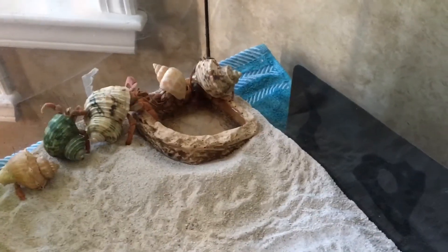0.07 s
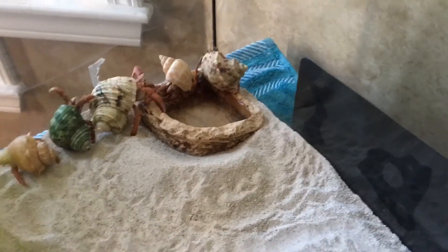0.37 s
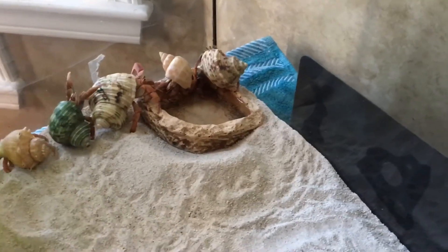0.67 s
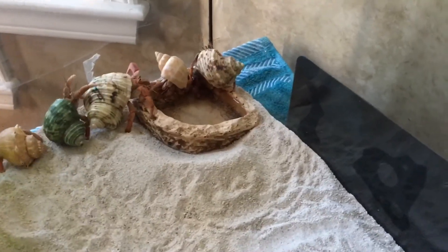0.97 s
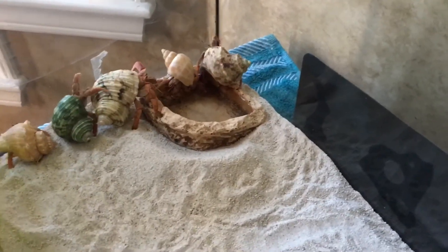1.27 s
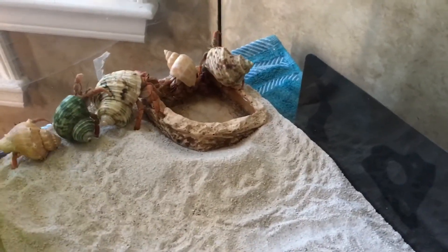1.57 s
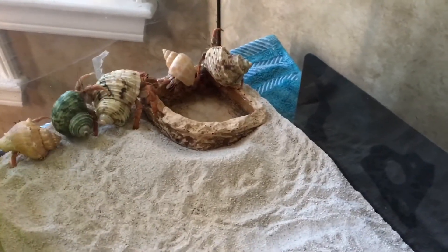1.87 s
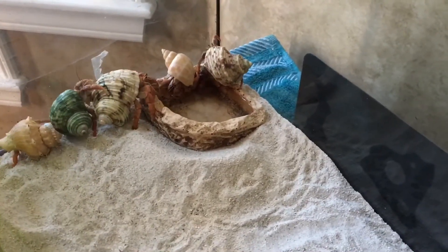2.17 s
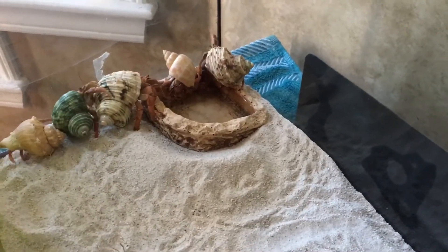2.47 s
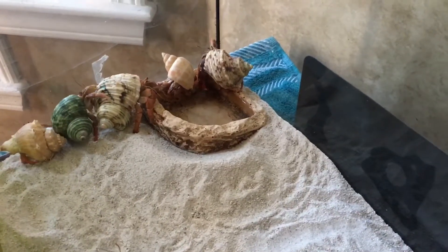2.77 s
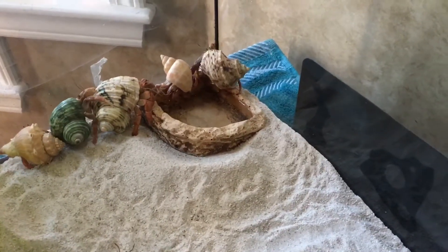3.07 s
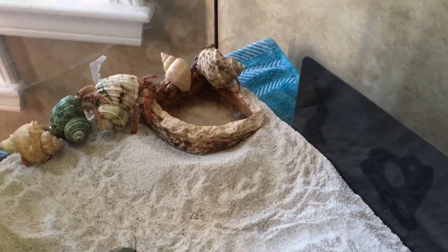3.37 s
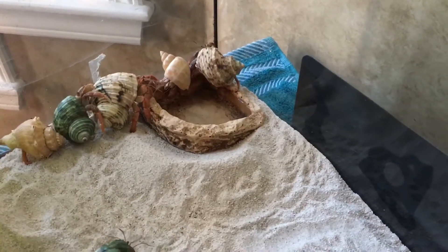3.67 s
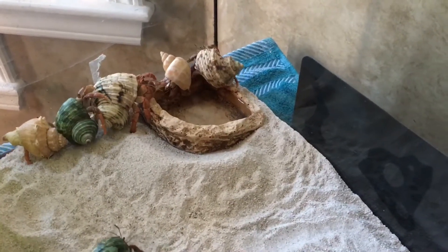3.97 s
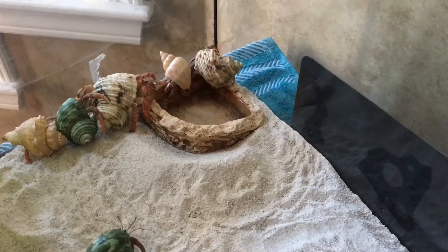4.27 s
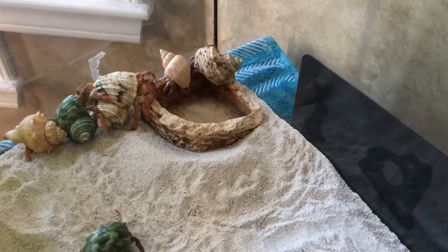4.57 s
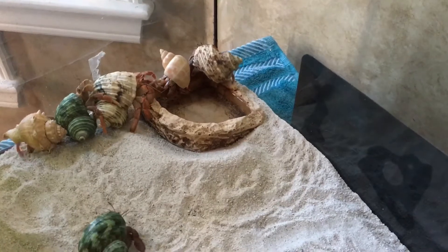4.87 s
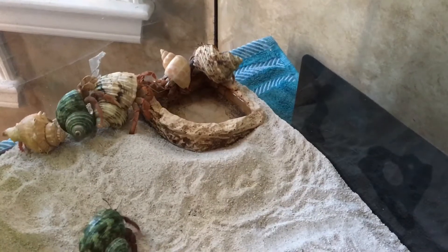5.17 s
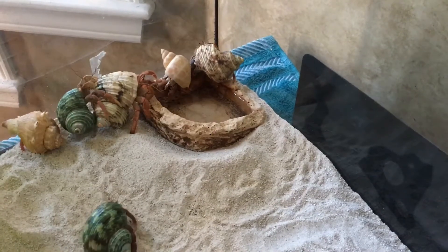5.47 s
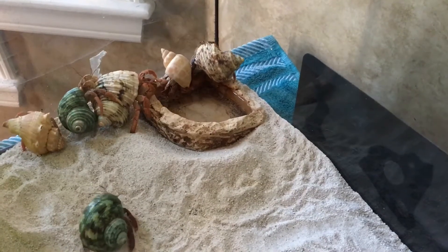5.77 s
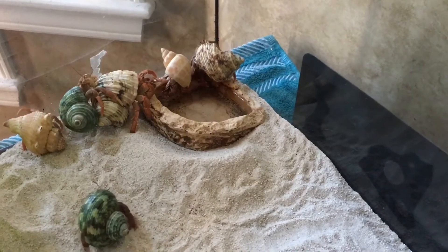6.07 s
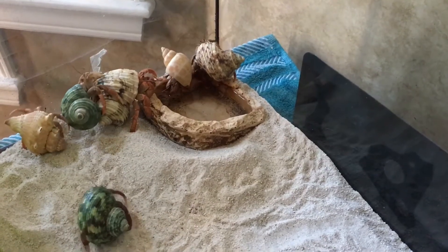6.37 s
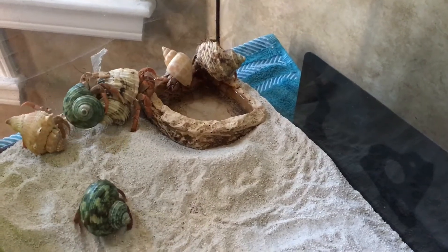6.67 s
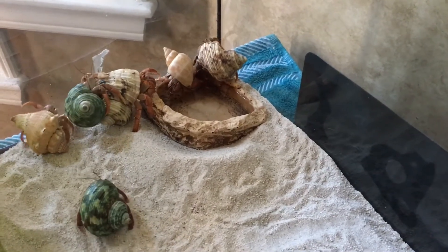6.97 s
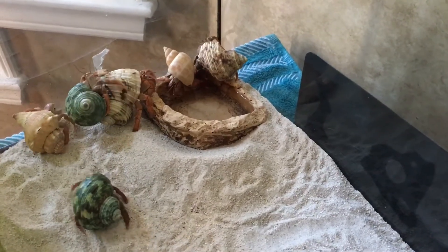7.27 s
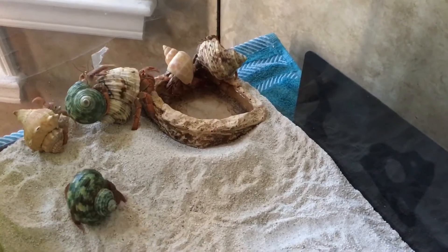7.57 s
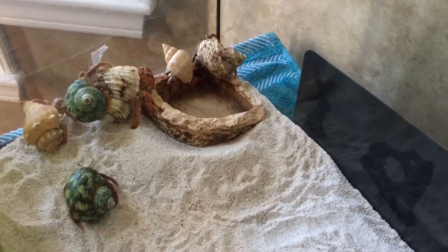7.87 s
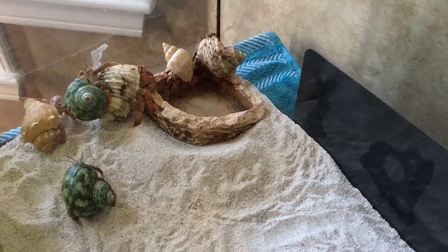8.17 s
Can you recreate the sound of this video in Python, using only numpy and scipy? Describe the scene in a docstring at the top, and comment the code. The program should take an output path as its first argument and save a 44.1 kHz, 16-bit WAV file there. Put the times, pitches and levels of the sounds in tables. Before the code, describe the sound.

Hermit crabs knock and click their shells lightly against a dish and tank glass, over a low room hum.

```python
"""Hermit crabs knock their shells on a dish and on the glass wall of a sand-filled tank.
Each impact excites damped modes, and dispersion of the bending waves makes its onset a short chirp.
Force sets the level, contact hardness the brightness, and the point of impact the bass.
Shells click together, drag, and squeak once by stick-slip friction; legs tick and rustle in the sand.
Behind them is a quiet room with faint reverberation, a steady rumble and a low hum."""
import sys
import numpy as np
from scipy import signal
from scipy.fft import rfft, irfft
from scipy.io import wavfile
from scipy.ndimage import uniform_filter1d

SR = 44100
rng = np.random.default_rng(int(sys.argv[2]) if len(sys.argv) > 2 else 0)


def output_pcm(signal):
    """Save a mono or channel-first signal as 16-bit PCM at the path in sys.argv[1].

    Samples are clipped to [-1, 1] before scaling.
    """
    pcm = np.clip(np.atleast_2d(signal).T, -1, 1) * 32767
    wavfile.write(sys.argv[1], SR, np.round(pcm).astype(np.int16))


N = 362943
SIZE = 8192  # samples in one blow or squeak
# Each entry: an edge in Hz of the bass, body, clack, crack and fizz bands.
EDGES = [200, 480, 1300, 3000, 8000, 16000]


# Each row: start in seconds, force in dB, contact cut-off in Hz (low for a soft leg, high for a
# hard shell), added bass in dB (more for a central blow).
DISH_BLOWS = [(0.0606, -52, 3600, 2), (0.2925, -50.5, 1950, -2), (0.4057, -48, 2600, -1),
              (2.5825, -45, 3740, -3), (3.0335, -39.5, 1600, 7), (3.2405, -46, 850, -7),
              (3.2488, -42.5, 1650, 9), (3.5027, -33, 2320, -19.5), (3.5063, -32, 4730, -1),
              (3.5437, -43.5, 3000, 6.5), (5.438, -39.5, 1500, 10), (5.4485, -24.3, 18000, -0.5),
              (5.7099, -49, 1200, 0), (6.6394, -31.5, 7500, 1), (6.775, -48, 3000, 2),
              (6.818, -54, 2100, -11), (7.0636, -39.5, 6200, -1.5), (7.8491, -42, 5100, 2.5),
              (8.0532, -38, 4700, 3), (8.1748, -47, 2900, 5)]
# Each row: mode frequency in Hz, relative level in dB, 60 dB decay time in seconds.
DISH_MODES = [(293, 5.5, 0.078), (427, -7.5, 0.06), (626, 0, 0.049), (673, -1, 0.05), (863, -8.5, 0.057),
              (953, 1, 0.037), (1060, -14, 0.046), (1214, 2.5, 0.026), (1346, -4.5, 0.021),
              (1552, 4.5, 0.04), (1790, -10.5, 0.045), (2108, -6, 0.067), (2152, -7.5, 0.053),
              (2900, 0, 0.014), (3680, -1, 0.025), (3860, 5.5, 0.024), (4330, 7.5, 0.018),
              (4700, -1, 0.032), (5180, -2, 0.03), (5560, -3, 0.022), (6550, -22, .015), (6400, -3, 0.014),
              (8600, -26, 0.016), (8850, -11, 0.042)]
# Each entry: radiation gain in dB, for bass, body, clack and crack in turn.
DISH_RADIATION = [-7, 0.5, -2, -5]

def dish_knocks(crack_shift_db):
    """Modal vibration: the struck dish rings briefly at its natural frequencies."""
    return impacts(DISH_BLOWS, contact(DISH_RADIATION), DISH_MODES, EDGES[:-1], top_db=-11.5, low_db=0.5,
                   scatter_db=0.5, crack_db=crack_shift_db - 4.5, crack_t60=0.045, crack_hz=4900,
                   spread_s=0.001, first_db=-9)


# Each row: start in seconds, force in dB, contact cut-off in Hz, added bass in dB.
WALL_BLOWS = [(0.3441, -50, 700, 2), (0.5786, -51, 740, -7), (0.8073, -43.5, 1090, 8),
              (1.2901, -47, 1020, 5.5), (2.0876, -29, 1260, -2.5), (2.4317, -46, 1220, -11),
              (2.9122, -31, 3330, -3), (3.0652, -44.5, 1480, -1), (4.46, -54.5, 2000, 10),
              (5.1206, -50, 680, 1), (5.1856, -42.5, 3440, 0), (5.9068, -52, 3500, 2.5),
              (7.9268, -42.5, 1790, -16), (8.0014, -54, 1960, 4), (8.218, -46, 2430, 0)]
# Each row: mode frequency in Hz, relative level in dB, 60 dB decay time in seconds.
WALL_MODES = [(194.6, -9, 0.21), (290, -10.5, 0.22), (466, -18.5, 0.23), (580, -20, 0.19),
              (675, -4.5, 0.078), (930, -8, 0.11), (1060, -2.5, 0.026), (1227, -5, 0.059),
              (1503, -12, 0.048), (1600, -2.5, 0.03), (1640, -28, 0.043), (1980, -26, 0.11),
              (2270, -4, 0.028), (2870, -7, 0.035), (3530, -6, 0.043), (4100, 1, 0.023), (4550, -3, 0.028),
              (5500, 2, 0.01), (6200, -1.5, 0.0093)]
# Each entry: radiation gain in dB, for bass, body, clack and crack in turn.
WALL_RADIATION = [-10.5, 0.5, -1, 2]

def wall_knocks(crack_shift_db):
    """Plate bending: the lightly damped low modes of the glass ring longest."""
    return impacts(WALL_BLOWS, contact(WALL_RADIATION), WALL_MODES, EDGES[:-1], top_db=-5, low_db=-13,
                   scatter_db=0.5, crack_db=crack_shift_db - 7, crack_t60=0.039, crack_hz=3970,
                   spread_s=0.00085, first_db=-12.5)


# Each row: start in seconds, force in dB, contact cut-off in Hz.
SHELL_BLOWS = [(2.4301, -52, 1900), (2.7441, -48.5, 2070), (3.6301, -44, 3760), (3.7766, -55.5, 2100),
               (3.8243, -47, 2900), (3.9277, -45, 1600), (3.9799, -58, 9000), (4.4112, -55.5, 3100),
               (4.7873, -56, 2600), (5.0058, -59, 4900), (5.1665, -60, 5500), (5.2809, -54, 2700),
               (5.8406, -63, 5500), (6.4232, -56.5, 1900), (7.8491, -35.5, 1900)]
# Each row: mode frequency in Hz, relative level in dB, 60 dB decay time in seconds.
SHELL_MODES = [(2320, -33, 0.026), (2360, 4, 0.019), (2620, 0.5, 0.02), (3210, -0.5, 0.02),
               (3690, -1.5, 0.035), (3920, -14, 0.042), (8500, -36, .012), (11200, -17, 0.014)]
# Each entry: radiation gain in dB, for clack and crack in turn.
SHELL_RADIATION = [0, 1.5]

def shell_clicks():
    """Collision of small bodies: shells have only high modes, so they click."""
    return impacts(SHELL_BLOWS, contact(SHELL_RADIATION), SHELL_MODES, EDGES[2:-1], top_db=-9,
                   low_db=-0.5, scatter_db=5, crack_db=-7, crack_t60=0.026, crack_hz=6000,
                   spread_s=0.0004)


# Each row: start in seconds, level in dB, spectral centre in Hz.
LEG_STEPS = [(0.4351, -74, 7650), (0.7293, -71.5, 7800), (2.1145, -62, 7200), (3.0461, -66, 6900),
             (3.1602, -66.5, 6200), (3.3829, -63.5, 5700), (3.4979, -53, 6500), (3.9934, -53, 8600),
             (5.3617, -58, 6940), (5.639, -61.5, 8600), (6.0869, -56.5, 7400), (7.0584, -62, 9450),
             (7.3665, -72, 9800), (7.3931, -68, 8600), (7.6742, -54, 12600), (7.7704, -65, 12400),
             (8.1454, -66, 10000), (8.181, -63, 10000)]
# Each row: mode frequency in Hz, relative level in dB, 60 dB decay time in seconds.
GRIT_MODES = [(3650, -10, .008), (5750, 10, 0.013), (8800, 9, 0.0088), (11400, 10, 0.015),
              (13200, -23, .008)]

def leg_ticks():
    """Point impact: a leg tip on grit gives a broad spectral hump, higher for finer grit."""
    def band_levels(centres, db, centre_hz):
        hump_db = -13 * np.log2(centres / centre_hz) ** 2
        return db + hump_db - 20 * np.log10(np.linalg.norm(undb(hump_db)))
    return impacts(LEG_STEPS, band_levels, GRIT_MODES, EDGES[-3:], top_db=-8, low_db=4, scatter_db=9,
                   crack_db=6.5, crack_t60=0.026, crack_hz=10000, spread_s=0.00055)


def contact(radiation_db):
    """Contact time limits bandwidth: a softer blow lasts longer and loses treble."""
    def band_levels(centres, force_db, cutoff_hz, bass_db=0):
        excess_db = 16 * np.log2(centres / cutoff_hz)  # 16 dB an octave
        band_db = force_db + np.array(radiation_db) - 10 * np.log10(1 + undb(2 * excess_db))
        band_db[0] += bass_db
        return band_db
    return band_levels


def impacts(events, band_levels, modes, edges, top_db, low_db, spread_s, **ringing):
    """Source and filter: each blow on one object is shaped to the band levels of its contact."""
    out, f, edges = np.zeros(N), bins(SIZE), np.array(edges)
    centres = np.sqrt(edges[1:] * edges[:-1])
    # Beyond the bands, the gain changes by top_db or low_db for each octave outward.
    octaves_above = np.log2(np.maximum(f / (0.93 * edges[-1]), 1))
    octaves_below = np.log2(np.clip(edges[0] / f, 1, 10))
    skirts = causal(top_db * octaves_above + low_db * octaves_below)
    for start, *touch in events:
        blow = ring(modes, spread_s=spread_s, **ringing) * skirts
        band_db, gain_db = band_levels(centres, *touch), np.zeros(len(f))
        for _ in centres:  # the bands interact, so the gain settles over several passes
            power = np.abs(blow * undb(gain_db)) ** 2 * 2 / (SIZE * 0.02 * SR)  # energy over 20 ms
            now_db = 10 * np.log10(np.histogram(f, edges, weights=power)[0])
            gain_db += np.interp(np.log(f), np.log(centres), band_db - now_db)
        add(out, start - spread_s / 2, irfft(blow * causal(gain_db)))
    return out


def ring(modes, scatter_db, crack_db, crack_t60, crack_hz, spread_s, first_db=-np.inf):
    """Superposition: a blow's spectrum sums the first wave, the modes and a dense, noisy crack."""
    t, f = np.arange(SIZE) / SR, bins(SIZE)
    hz, db, t60 = np.transpose(modes)[:, :, None]
    place, detune = rng.standard_normal((2, len(modes), 1))
    decay = undb(db + scatter_db * place - 60 * t / t60)  # the point of impact weights the modes
    tones = (decay * np.cos(2 * np.pi * hz * (1 + 0.017 * detune) * t)).sum(axis=0)
    tones *= 1 - np.exp(-t / 0.00014)  # the contact takes a moment to push
    build = 1 - np.exp(-t / (spread_s + 1 / SR))  # waves return from the edges
    noise = rng.standard_normal(SIZE) * build * undb(-60 * t / crack_t60)
    crack = irfft(rfft(noise) / (1 + 1j * f / crack_hz) ** 2)
    first_wave = irfft(1j * f / (600 + 1j * f) / (1 + 1j * f / 2570) ** 2)  # 600 to 2570 Hz
    blow = rfft(level(tones, 0) + level(crack, crack_db) + level(first_wave, first_db))
    # Dispersion: bending waves carry treble faster than bass, giving a falling chirp.
    return blow * np.exp(-4j * np.pi * spread_s * np.sqrt(f * 1000))


# Each row: time in seconds, slip rate in Hz, amplitude of the fundamental in dB.
SQUEAK_PATH = [(4.4633, 5400, -63), (4.466, 4850, -32), (4.4675, 4550, -39), (4.4706, 4940, -40),
               (4.471, 5400, -35), (4.474, 5350, -41), (4.481, 4900, -61)]

def squeak(second_db, third_db):
    """Stick-slip oscillation: a shell on glass gives a brief, uneven whistle with harmonics."""
    times, hz, db = np.transpose(SQUEAK_PATH)
    t = times[0] + np.arange(SIZE) / SR
    wobble = uniform_filter1d(uniform_filter1d(rng.standard_normal(SIZE), size=30), size=30)
    slip_hz = np.interp(t, times, hz) * (1 + level(wobble, -27))
    phase = 2 * np.pi * np.cumsum(slip_hz) / SR
    tone = np.sin(phase) + undb(second_db) * np.sin(2 * phase) + undb(third_db) * np.sin(3 * phase)
    out = np.zeros(N)
    add(out, times[0], tone * undb(np.interp(t, times, db, right=-200)))
    return out


# Each row: start in seconds, length in seconds, resonance in Hz, filter width in Hz, level in dB.
DRAGS = [(0.27, 0.07, 6300, 2400, -71), (0.502, 0.19, 1990, 800, -68.5), (2.381, 0.055, 6400, 2600, -64),
         (2.45, .08, 12000, 1400, -72), (2.868, 0.043, 1480, 2200, -58.5), (3.008, 0.024, 1000, 800, -53),
         (4.569, 0.32, 700, 220, -60.5), (4.726, 0.11, 2980, 2200, -67), (5.354, 0.07, 710, 450, -57),
         (5.724, 0.033, 8200, 1200, -66.5), (5.852, 0.38, 5800, 1300, -75), (6.362, 0.067, 5400, 1600, -71),
         (6.569, 0.089, 5850, 1400, -66.5), (6.621, 0.022, 804, 704, -39.5), (7.039, 0.019, 800, 800, -58),
         (7.25, 0.36, 11400, 1200, -81.5), (7.66, 0.37, 11100, 1500, -76)]

def scrapes(catches_per_s, spread_db):
    """Sliding friction: a swelling run of tiny catches drives one resonance of a leg or shell."""
    out = np.zeros(N)
    for start, length, hz, width, db in DRAGS:
        n = int(length * SR)
        catches = (rng.random(n) < catches_per_s / SR) * rng.standard_normal(n)
        catches *= undb(spread_db * rng.exponential(size=n))
        grip_db = np.repeat(rng.uniform(-7, 7, n // 441 + 1), 441)[:n]  # changes every 10 ms
        b, a = signal.iirpeak(hz, hz / width, fs=SR)
        rasp = signal.lfilter(b, a, signal.lfilter(b, a, catches * undb(grip_db)))
        add(out, start, level(rasp * np.sin(np.pi * np.arange(n) / n), db))
    return out


def stray_touches(modes, count, db, spread_db, crack_hz):
    """Random impacts: faint touches of many legs grow more frequent as the crabs get moving."""
    out = np.zeros(N)
    for when, size in rng.random((count, 2)):
        touch = irfft(ring(modes, scatter_db=1.4, crack_db=0, crack_t60=0.01, crack_hz=crack_hz,
                           spread_s=0))
        peak = undb(db + spread_db * size ** 2)
        add(out, when ** 0.75 * N / SR, peak * touch / np.abs(touch).max())
    return out


def sand_rustle(grains_per_s, spread_db, db, swell_db, band_hz):
    """Shot noise: sand grains shift under the legs in flurries, each with a 3 ms skitter."""
    flurry = np.interp(np.arange(N), np.linspace(0, N, 200), rng.uniform(-1, 1, 200))
    grains = (rng.random(N) < grains_per_s / SR) * undb(spread_db * rng.random(N) + swell_db * flurry)
    envelope = signal.lfilter([1], [1, -np.exp(-1 / (0.003 * SR))], grains)
    return level(butter(envelope * rng.standard_normal(N), 1, band_hz, "band"), db)


def room(x, db, mids_t60, wide_t60, low_hz, dull_hz, wide_db):
    """Reverberation: reflections build within milliseconds into a diffuse, decaying tail."""
    t = np.arange(SR) / SR
    mids = butter(rng.standard_normal(SR), 4, dull_hz, "low")
    mids = butter(mids, 1, low_hz, "high")  # small bodies radiate little bass
    wideband = rng.standard_normal(SR) * undb(wide_db - 60 * t / wide_t60)
    tail = mids * undb(-60 * t / mids_t60) + wideband
    tail *= 1 - np.exp(-(t / 0.002) ** 2)
    return signal.fftconvolve(x, tail / np.linalg.norm(tail))[:N] * undb(db)


# Each row: frequency in Hz, relative spectral density in dB.
AIR_SPECTRUM = [(20, -32.5), (45, -6), (75, 3), (140, -2.5), (280, -9.5), (370, -20), (1000, -17),
                (2200, -25.5), (3000, -32.5), (4900, -39), (6000, -41), (10000, -44.5), (13000, -46),
                (16000, -52)]
# Each row: centre in Hz, width in Hz, height of the peak or dip in dB.
AIR_RESONANCES = [(36, 11.7, 14), (75, 3.4, 2.5), (90.9, 7.2, 9), (110, 17, -5.5), (134.8, 22, 10),
                  (145.8, 7.8, -7), (184, 6, 7), (413.7, 24, 7.5), (641, 62, 5), (10400, 380, -11.5),
                  (11000, 740, 1.5)]

def air(noise_db, hum_hz, hum_db):
    """Stationary noise: household machines rumble and hiss, with mains hum."""
    f = bins(N)
    hz, db = np.transpose(AIR_SPECTRUM)
    shape_db = np.interp(np.log(f), np.log(hz), db) - 30 * np.log10(np.maximum(20 / f, 1))
    for centre, width, peak_db in AIR_RESONANCES:
        shape_db += peak_db / (1 + (2 * (f - centre) / width) ** 2)
    noise = irfft(rfft(rng.standard_normal(N)) * undb(shape_db), N)
    hum = np.sin(2 * np.pi * hum_hz * np.arange(N) / SR)
    return level(noise, noise_db) + level(hum, hum_db)


def undb(db):
    """Decibels to gain."""
    return 10 ** (np.asarray(db) / 20)


def level(x, db):
    """Set the rms level."""
    return x * undb(db) / np.sqrt(np.mean(x ** 2))


def add(out, start_s, x):
    """Superpose x on out from start_s."""
    i = max(int(start_s * SR), 0)
    out[i:i + len(x)] += x[:max(N - i, 0)]


def bins(size):
    """Frequencies of a spectrum, kept above zero."""
    return np.maximum(np.arange(size // 2 + 1) * SR / size, 1)


def butter(x, order, hz, kind):
    """Maximally flat filtering."""
    return signal.sosfilt(signal.butter(order, hz, kind, fs=SR, output="sos"), x)


def causal(db):
    """Causality: the minimum-phase response of a gain curve puts nothing before the blow."""
    cepstrum = irfft(np.log(undb(db)))
    cepstrum[1:SIZE // 2] *= 2
    cepstrum[SIZE // 2 + 1:] = 0
    return np.exp(rfft(cepstrum))


def scene():
    """Superposition: direct sound from the tank, its reverberation and the room's own noise."""
    light = shell_clicks() + leg_ticks()
    light += stray_touches(GRIT_MODES, count=50, db=-70, spread_db=19, crack_hz=10000)
    light += stray_touches(SHELL_MODES, count=24, db=-70, spread_db=9, crack_hz=3000)
    light += scrapes(catches_per_s=1480, spread_db=3)
    light += sand_rustle(grains_per_s=220, spread_db=20, db=-75.5, swell_db=9, band_hz=[4000, 9700])
    slip = squeak(second_db=-10, third_db=-19)
    # Each direction carries its own mix of modes, so the room's blend of them is smooth.
    directions = [dish_knocks(crack_shift_db=7) + wall_knocks(crack_shift_db=7) + light + 2 * slip
                  for _ in range(3)]
    reverb = sum(room(x, db=-24.5, mids_t60=0.35, wide_t60=0.34, low_hz=840, dull_hz=5850, wide_db=-6.5)
                 for x in directions)
    direct = dish_knocks(crack_shift_db=-5) + wall_knocks(crack_shift_db=-5) + light + slip
    return (direct + reverb + air(noise_db=-47.5, hum_hz=122.25, hum_db=-53))[None]


def record(dry):
    """Band limiting: a steep low-pass removes the treble above 15.9 kHz."""
    return signal.sosfilt(signal.ellip(10, 0.2, 70, 15900, fs=SR, output="sos"), dry)


dry = scene()
out = record(dry)
output_pcm(out)
```